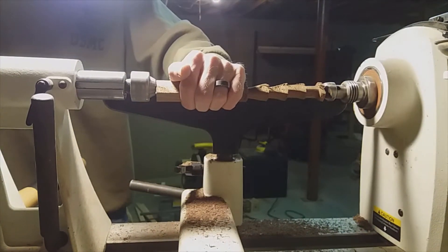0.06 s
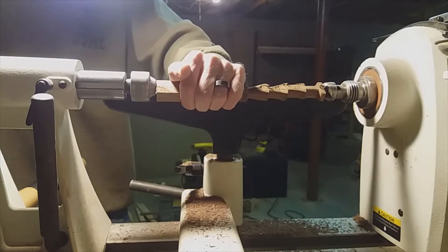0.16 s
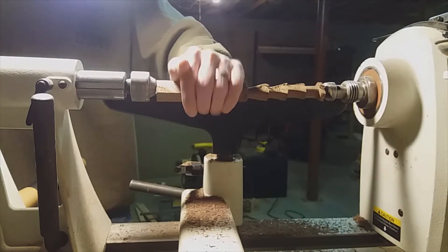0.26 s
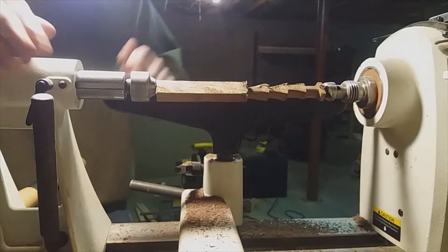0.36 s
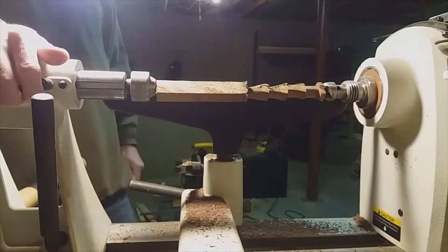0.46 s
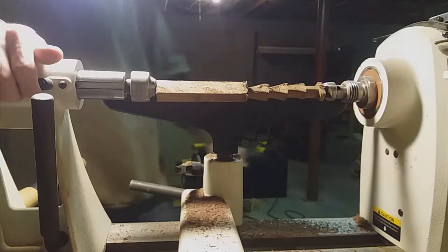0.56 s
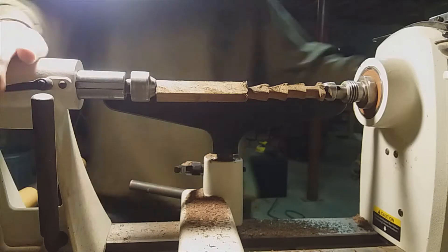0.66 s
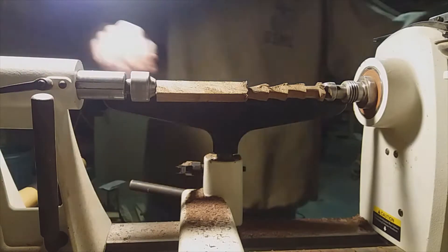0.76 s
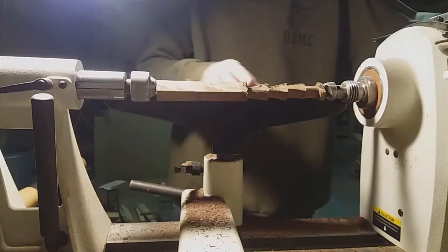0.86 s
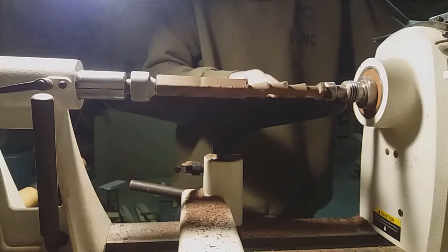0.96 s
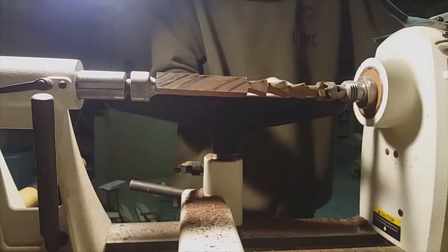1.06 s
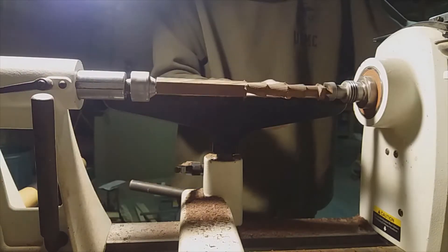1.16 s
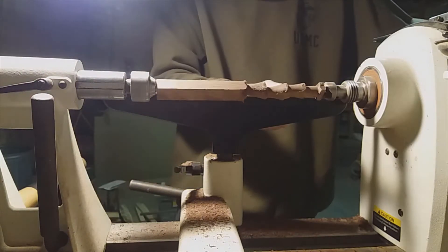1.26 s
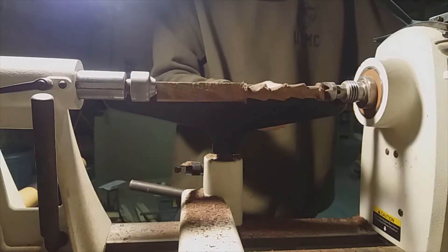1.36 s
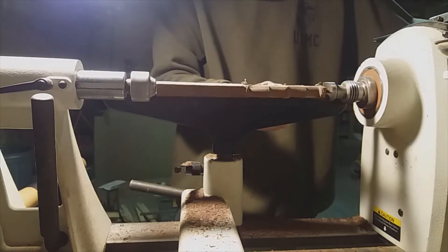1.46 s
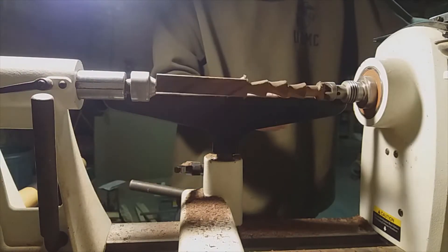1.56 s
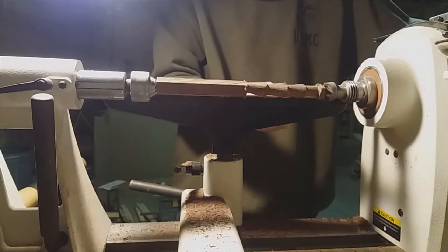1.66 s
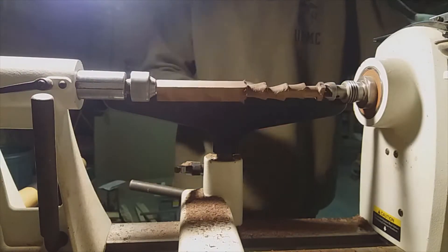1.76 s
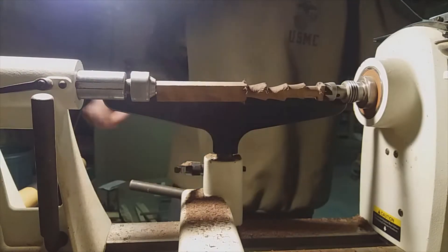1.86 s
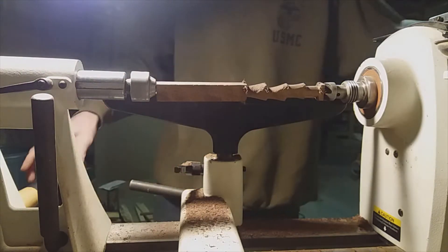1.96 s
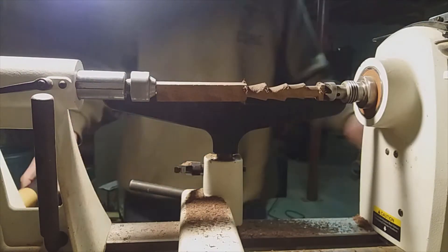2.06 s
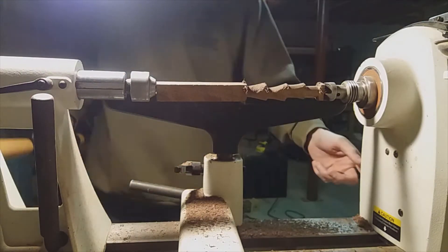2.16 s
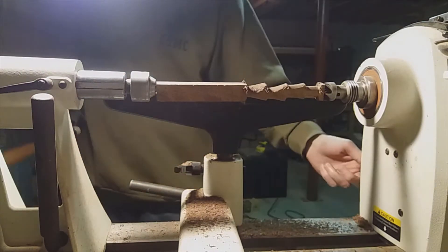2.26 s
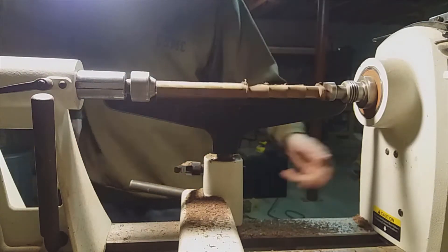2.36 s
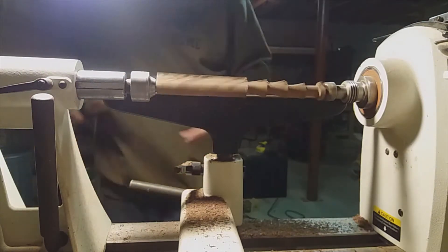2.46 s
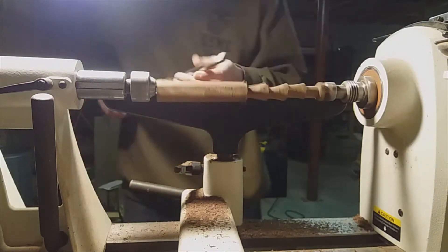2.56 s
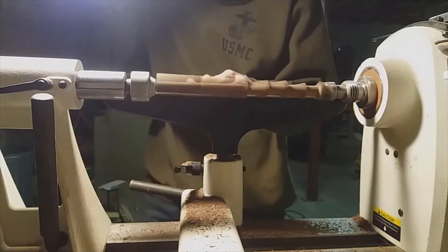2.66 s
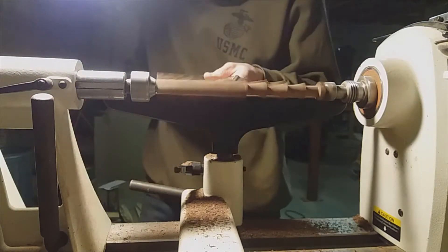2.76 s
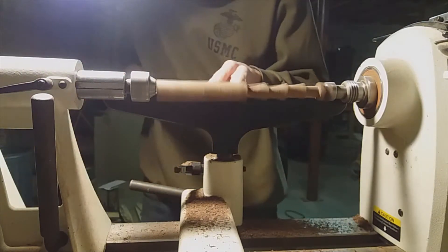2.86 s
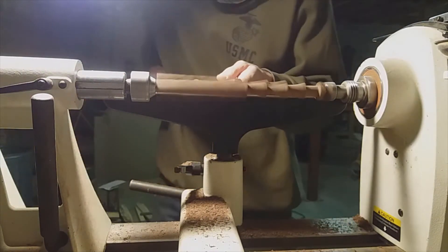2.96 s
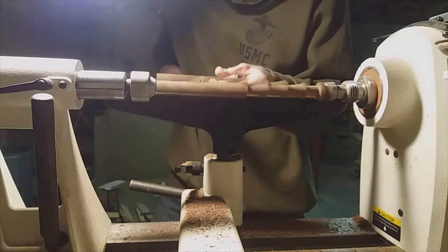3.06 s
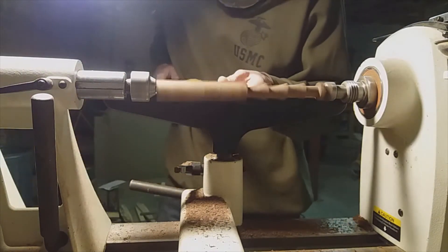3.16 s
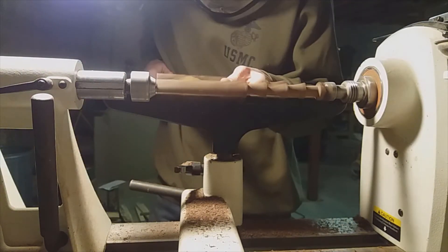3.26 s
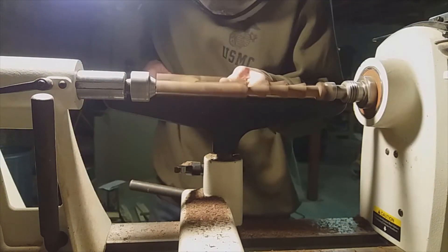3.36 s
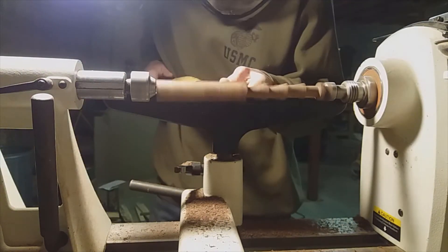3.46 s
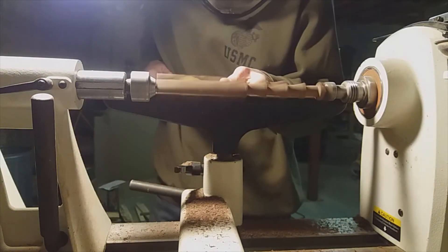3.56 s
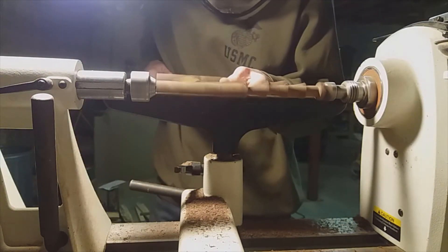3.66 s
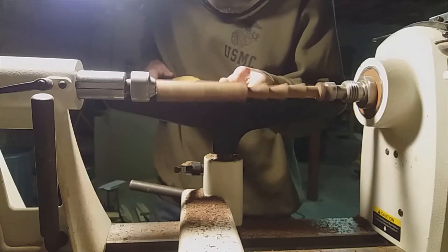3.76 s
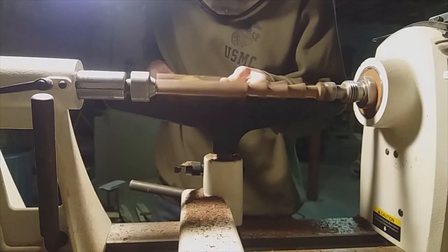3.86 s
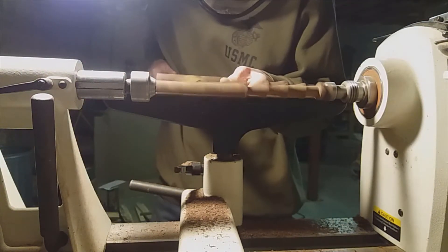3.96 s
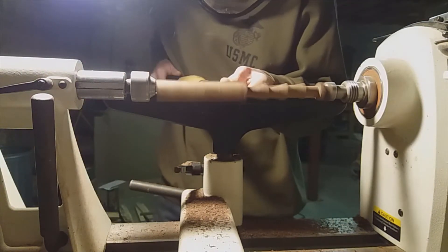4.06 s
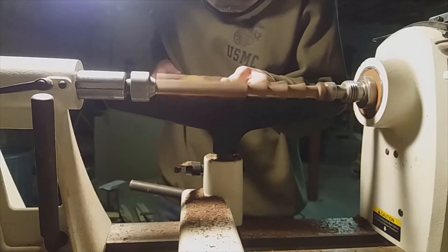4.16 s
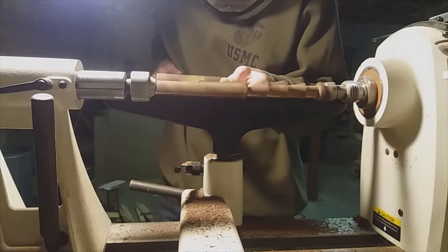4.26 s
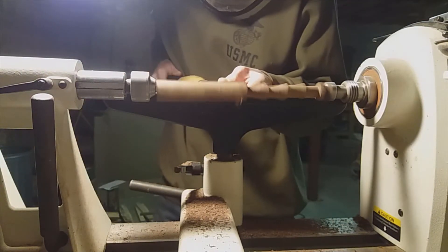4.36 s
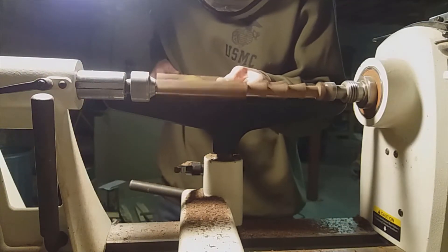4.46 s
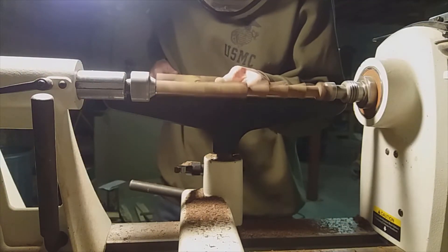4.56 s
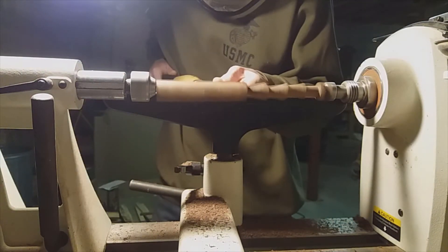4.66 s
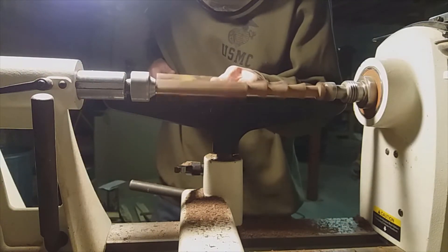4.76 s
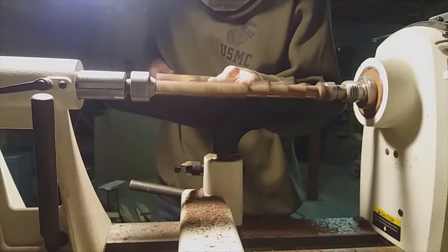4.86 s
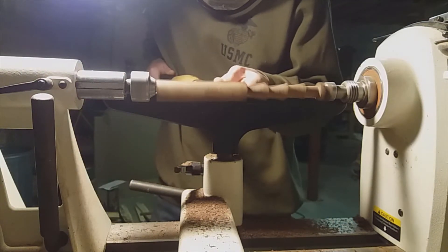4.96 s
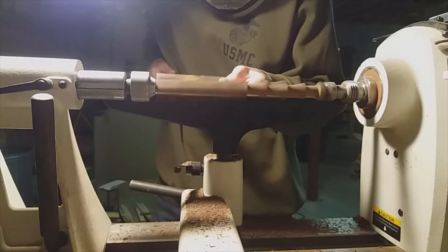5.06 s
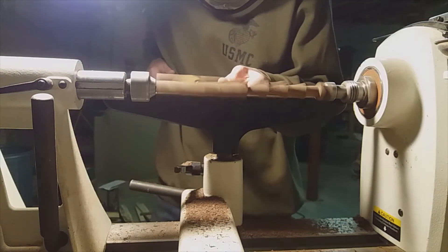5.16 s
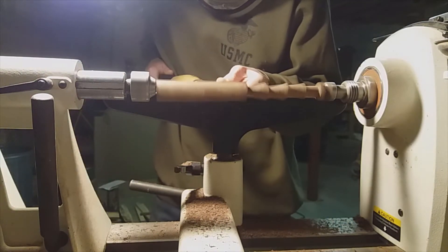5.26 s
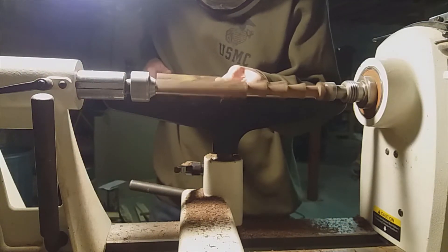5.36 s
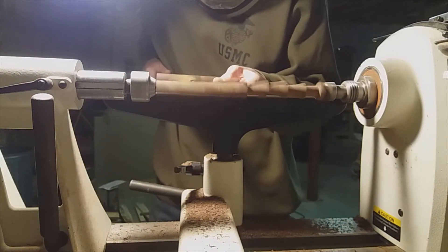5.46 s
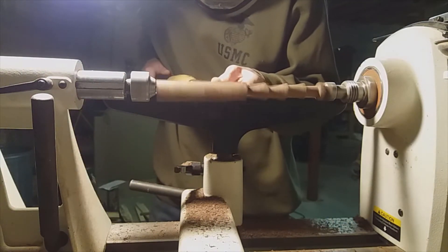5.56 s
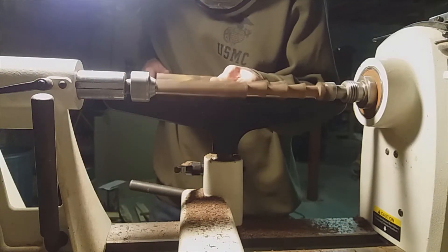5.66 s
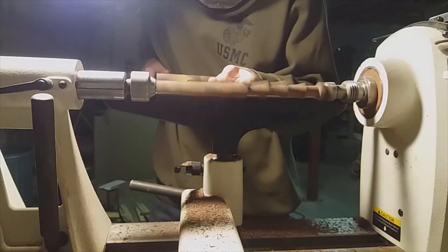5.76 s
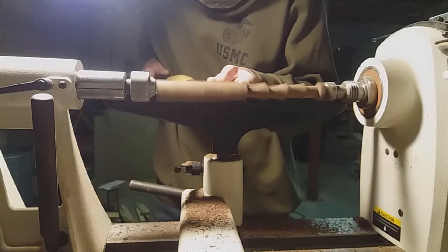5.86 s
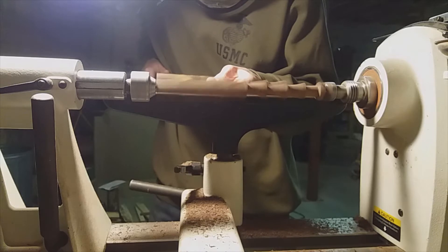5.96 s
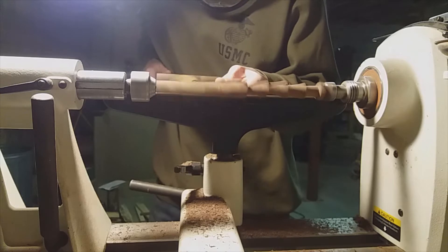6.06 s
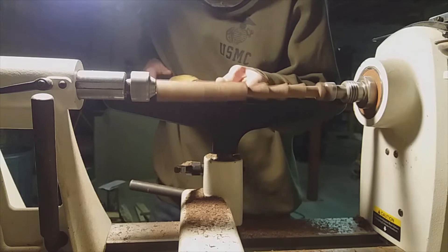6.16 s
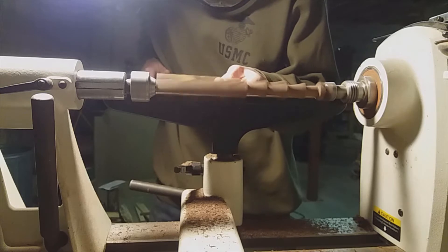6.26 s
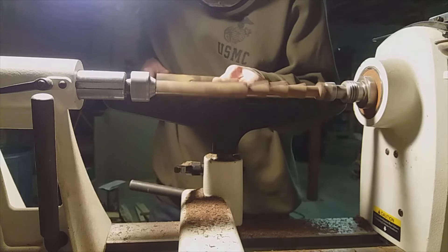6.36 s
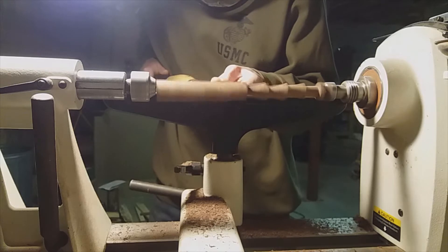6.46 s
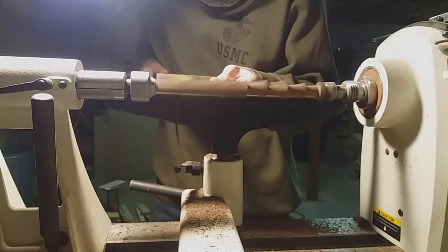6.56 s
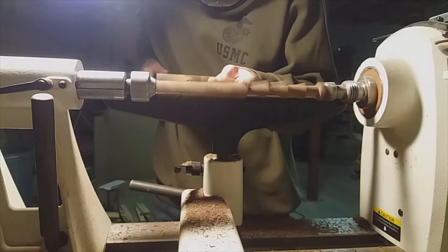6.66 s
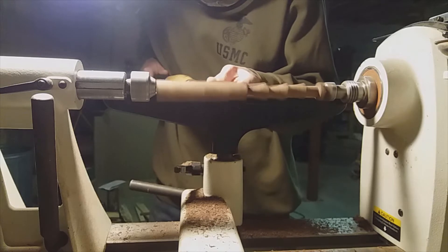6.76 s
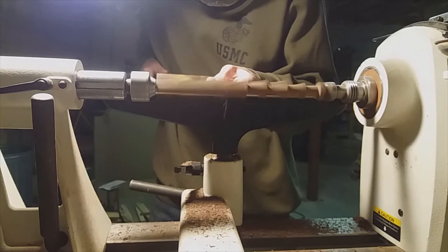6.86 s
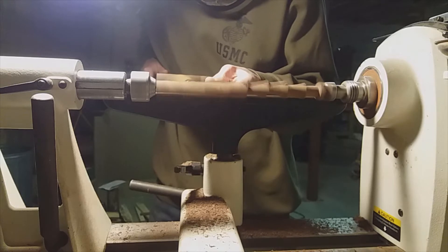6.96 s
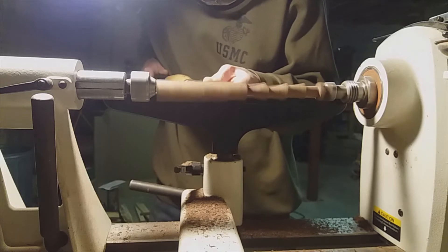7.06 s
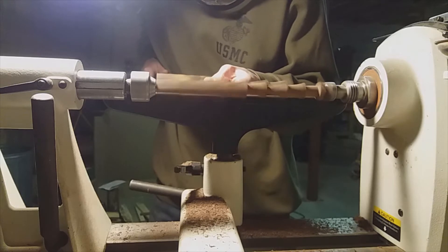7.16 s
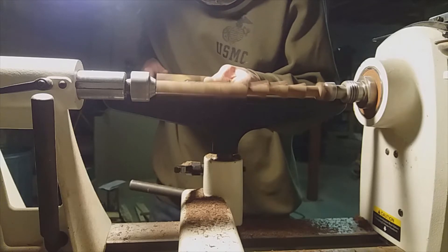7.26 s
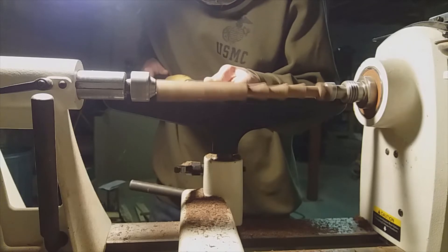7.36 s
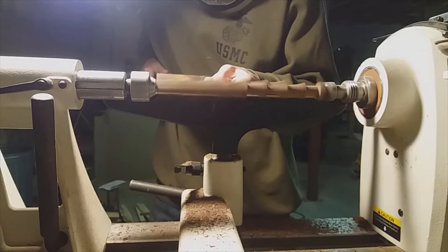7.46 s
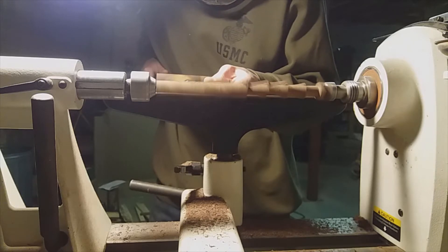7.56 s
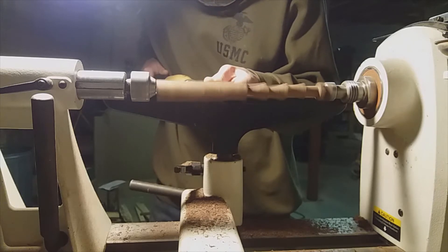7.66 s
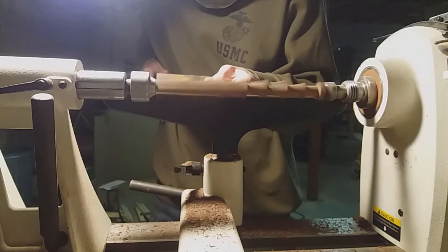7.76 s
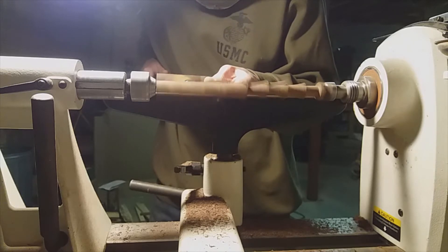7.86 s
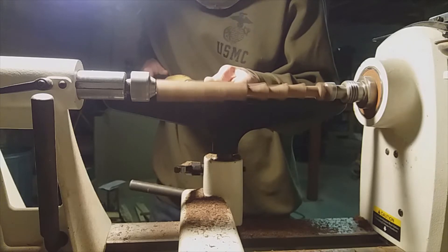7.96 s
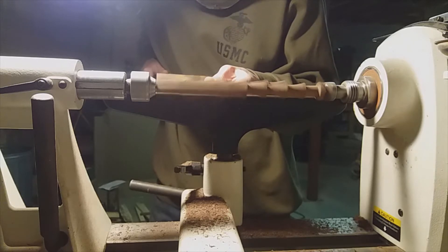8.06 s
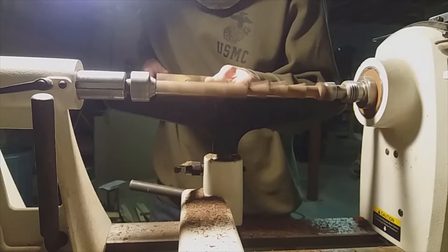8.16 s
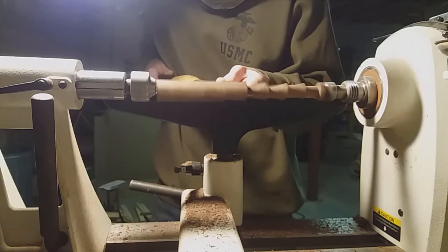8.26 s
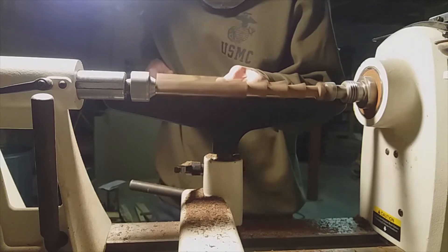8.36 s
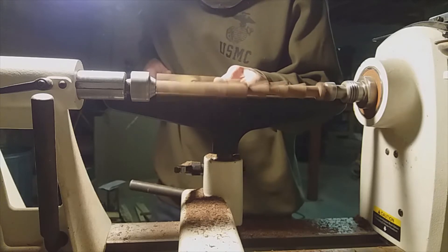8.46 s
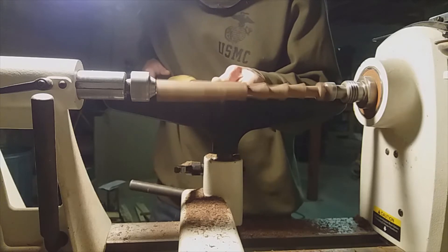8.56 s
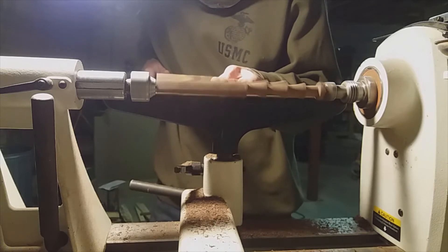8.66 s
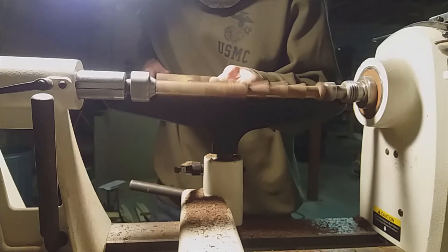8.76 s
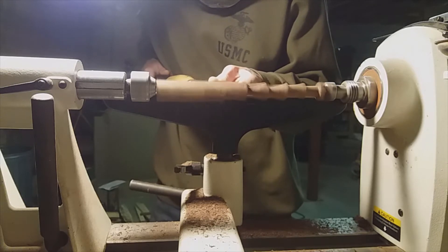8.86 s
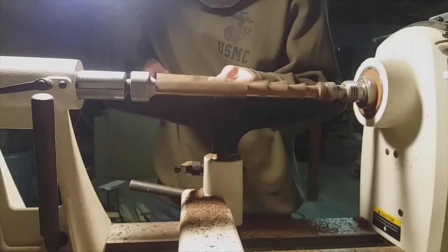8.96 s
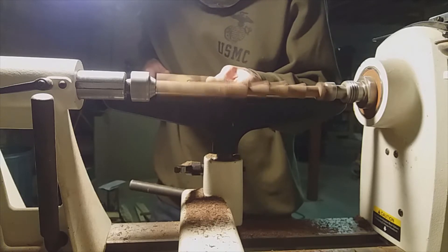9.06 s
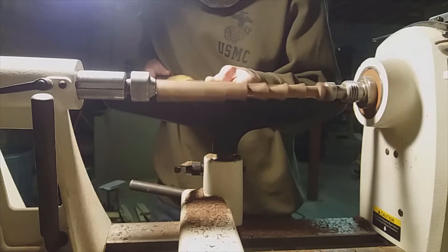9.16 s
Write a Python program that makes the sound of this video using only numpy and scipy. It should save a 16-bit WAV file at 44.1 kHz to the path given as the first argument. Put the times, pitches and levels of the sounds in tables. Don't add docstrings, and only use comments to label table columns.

```python
import sys
import numpy as np
from scipy import signal
from scipy.fft import rfft, irfft, next_fast_len
from scipy.io import wavfile
from scipy.ndimage import uniform_filter1d, map_coordinates

SR = 44100
rng = np.random.default_rng(int(sys.argv[2]) if len(sys.argv) > 2 else 0)


def linear_from_db(decibels):
    return 10 ** (np.asarray(decibels, float) / 20)


def log_audio(samples):
    frames = np.atleast_2d(samples).T
    limited = np.clip(frames, -1, 1)
    pcm = np.round(limited * 32767).astype(np.int16)
    wavfile.write(sys.argv[1], SR, pcm)


N = 405276
T = np.arange(N) / SR

CORNER_HZ, CORNER_LAG = 56.7, 0.69
# frequency in Hz, level in dB.
SQUEAL_TONES = [(2302, 2), (2140, -25), (2715, -14), (2954, -9), (3190, -19)]
# frequency in Hz, level in dB.
LOW_SQUEAL_TONES = [(2064, 1), (1887, -2.5), (1730, -6.5)]
# frequency in Hz, width in Hz, level in dB.
BLANK_MODES = [(450, 50, -15), (610, 60, -20), (850, 50, -12), (965, 25, -9), (1135, 30, -1), (1245, 30, 0)]
# frequency in Hz, width in Hz, level in dB.
CENTRE_MODES = [(1225, 360, 0.5), (580, 410, -1)]
# frequency in Hz, density in dB per Hz.
GRIT_COLOUR = [(530, -51), (900, -45), (1230, 4), (1380, -11.5), (1560, 0), (1860, -2), (2310, -1),
               (2510, -2.5), (3000, -7), (3860, -11), (6610, -14), (15600, -23)]
# frequency in Hz, width in Hz, level in dB.
PAPER_MODES = [(4800, 500, -4), (6550, 800, 0), (8600, 500, -1), (10000, 700, -3), (13600, 900, -1)]
# time in seconds, grit level in dB.
STROKE_PRESSURE = [
    [(4.03, -41), (4.27, -40), (4.5, -34), (4.8, -32), (4.92, -44.5)],
    [(5.09, -32), (5.5, -29.5), (5.8, -29), (5.93, -31), (5.99, -36)],
    [(6.18, -30), (6.45, -30.5), (6.84, -30), (6.89, -26), (6.945, -34)],
    [(7.15, -34), (7.36, -30.5), (7.75, -30), (8.0, -28), (8.08, -24), (8.18, -33.5)],
    [(8.335, -31.5), (8.52, -28.5), (8.65, -30.5), (8.9, -29.5), (9.19, -33)],
]
# squeal, lower squeal and knock in dB beside the grit, change of the knock over the
# stroke in dB.
STROKE_VOICE = [(4.5, 6, 0.5, 4), (0.5, 2, 2, 1), (0, 1, 1.5, -2.5), (0, 4, 0, -6.5), (5.5, 2, -2, -1)]
# start in seconds, length in seconds, rise in dB.
SQUEAL_FLARES = [(4.84, 0.037, 8), (5.142, .04, 11.5), (5.2, .03, 5), (5.343, 0.028, 8.5), (5.5, .17, 3.5),
                 (5.718, 0.14, 6), (5.877, 0.043, 9), (5.934, 0.05, 11), (6.191, 0.042, 10),
                 (6.356, 0.078, 12), (6.502, 0.12, 8), (6.652, 0.075, 8), (6.746, 0.066, 9.5),
                 (7.155, 0.018, 16), (7.377, .03, 6), (7.44, 0.12, 10), (7.57, 0.081, 9.5),
                 (7.67, 0.12, 9.5), (7.802, 0.07, 12.5), (7.913, 0.093, 10.5), (8.017, 0.037, 7),
                 (8.107, 0.063, 13.5), (8.381, 0.058, 4), (8.518, 0.14, 3.5), (8.73, 0.083, 7.5),
                 (8.83, 0.051, 1.5), (8.953, 0.16, 1), (9.137, 0.051, 9)]
# time in seconds, change in dB.
FINGER_NUDGES = [(4.046, 8), (4.07, 6), (4.32, 5), (4.36, -4), (4.4, 3), (4.485, -3), (4.52, 1),
                 (4.565, -3), (4.61, 3), (4.67, -10.5), (4.745, -5.5), (4.79, 2), (4.85, -0.5), (4.885, 7),
                 (5.25, -1.5), (7.175, 1), (7.215, -5.5), (7.34, -1.5), (7.52, -2), (7.77, -2), (7.85, 1)]
FIRM_DB = -34.5
LOW_GROWS, KNOCK_GROWS = 1.1, 1.48
STEALS_LOW, STEALS_KNOCK = 0.18, 0.23

# time in seconds, motor turns a second.
MOTOR_SPEED = [(2.33, 15), (2.45, 33), (2.6, 49), (2.7, 59), (2.78, 68), (2.85, 79.5), (2.895, 83.62),
               (9.19, 83.62)]
MOTOR_ORDERS = [5, 6, 12, 16, 18, 24, 30, 35, 36, 37, 42, 48, 78]
# level on the housing's resonance in dB, change under load in dB.
ORDER_LEVELS = [(-56, 0), (-38.5, -1), (-45, 0.5), (-49.5, 1.5), (-52, 0), (-47, 1.5), (-69, 29),
                (-41, -12), (-43, 5.5), (-37.5, 6.5), (-46.5, -3), (-57.5, 9), (-46.5, 0.5)]
# frequency in Hz, width in Hz, level in dB.
HOUSING_MODES = [(3010, 320, 0), (502, 60, 0), (1004, 60, 0), (1338, 50, -2), (1505, 50, -2),
                 (2008, 50, -3), (3512, 25, -4), (6500, 600, 0), (4014, 40, -2), (2450, 500, -11)]
# frequency in Hz, width in Hz, level in dB.
FRAME_MODES = [(456, 142, -10.5), (820.3, 14, 3), (1263, 71, -10), (2106, 53, -7.5), (3010, 165, -6),
               (6400, 136, -17.5), (8120, 100, -19.5), (8560, 120, -22), (9880, 540, -23), (13800, 56, -20)]
# frequency in Hz, density in dB per Hz.
BEARING_COLOUR = [(120, -45), (200, -3.5), (439, -2.5), (499, -1), (599, -36), (999, -5.5), (1700, -8),
                  (2990, -16), (3730, -12), (6570, -11.5), (15800, -30)]
# time in seconds, level in dB.
BEARING_LEVEL = [(2.33, -37), (2.85, -35), (4, -36), (5, -36), (6.08, -37.5), (7.05, -36), (8.25, -38),
                 (9.19, -35.5)]
# frequency in Hz, width in Hz, level in dB.
FREE_CENTRE_HISS = [(6590, 580, 0)]
LOADED_CENTRE_HISS = [(6170, 300, 0)]
# time in seconds, half length in seconds, level in dB.
BELT_SQUEAKS = [
    (2.395, .014, -64),
    (2.452, 0.0067, -63),
]

# time in seconds, peak in dB, thud in dB, decay by 60 dB in seconds.
CONTACT_TICKS = [
    (2, -44, -8, 0.038),
    (2.3172, -24, -3.5, 0.032),
    (2.7847, -31, -19, 0.025),
    (3.1752, -22.5, -28, 0.026),
    (3.1796, -22, -27, 0.022),
]
# frequency in Hz, level in dB, decay by 60 dB in seconds.
SWITCH_RING = [(517, 0, 0.023), (1970, -26, 0.09), (3650, -24, 0.083), (5470, -39, 0.093),
               (6470, -21, 0.064), (8000, -36, 0.039), (11130, -41, 0.077)]
# frequency in Hz, width in Hz, level in dB.
CRACK_MODES = [(5100, 3100, 3.5), (13300, 4300, -17)]

# frequency in Hz, level in dB.
BLOWER_TONES = [(177.6, -50), (276, -57), (359, -60), (308, -70), (241, -69), (10497, -76)]
# frequency in Hz, width in Hz, level in dB.
DUCT_MODES = [(505, 93, 4), (549, 17, 12.5), (834, 39, 0), (1054, 20, -13)]
# frequency in Hz, density in dB per Hz.
AIR_COLOUR = [(100, -30), (160, -21), (310, -14), (400, -9), (500, -4), (630, -11), (800, -8), (1150, -10),
              (1500, -21), (2700, -21), (4000, -25), (8000, -34), (11000, -38), (15800, -44)]

# frequency in Hz, decay by 60 dB in seconds.
WALL_DECAY = [(200, 0.063), (2000, 0.31), (10000, 0.009)]
# frequency in Hz, left-right likeness from 0 to 1.
PORT_LIKENESS = [(60, .2), (150, 0.54), (500, 0.94), (1200, 0.5), (2400, 0.38), (5000, 0.38), (9000, 0.21),
                 (15000, 0.067)]
# frequency in Hz, left minus right in dB.
PORT_TILT = [(60, 0), (110, 21), (200, 1.5), (380, 3.5), (700, 1.5), (1290, 0.5), (2380, 3.5), (4400, -0.5),
             (8120, 0), (15000, -5.5)]
# frequency in Hz, lead of the left in radians.
PORT_LEAD = [(100, 0), (950, -.3), (1460, 0), (2300, -.9), (3100, -.9), (4220, -3.1), (6500, -4.5),
             (8300, -8.1), (10000, -9.2), (13000, -9.5), (16000, -12)]
# frequency in Hz, gain after the step in dB.
BASS_STEP = [(90, -1), (180, -9), (500, -6.5), (680, -8), (1000, -2.5), (3000, 1), (8000, 0)]


def unit(x):
    return x / np.sqrt(np.mean(x ** 2) + 1e-20)


def along(points, hz):
    f, v = np.transpose(points)
    return np.interp(np.log(hz + 1), np.log(f + 1), v)


def wobble(rate):
    return map_coordinates(rng.standard_normal(int(N * rate / SR) + 4), [T * rate])


def filtered(x, response):
    m = next_fast_len(N + SR // 2)
    return irfft(rfft(x, m) * response(np.fft.rfftfreq(m, 1 / SR)), m)[..., :N]


def modes(table, f):
    total = 0
    for k, (centre, width, db) in enumerate(table):
        damping = 1j * f * width
        total = total + (-1) ** k * linear_from_db(db) * damping / (centre * centre - f * f + damping)
    return total


def noise(spectrum, peaks=None, peak_db=0):
    white = rng.standard_normal((2, N))
    smooth = unit(filtered(white, lambda f: linear_from_db(along(spectrum, f))))
    if peaks is None:
        return smooth
    ringing = unit(filtered(white[::-1], lambda f: modes(peaks, f)))
    return unit(smooth + linear_from_db(peak_db) * ringing)


def sanding():
    place = T * CORNER_HZ - CORNER_LAG
    corner = np.floor(place).astype(int) + 1
    count = corner[-1] + 1
    luck = np.clip(rng.standard_normal((count, 24)), -2, 2)[corner].T
    since = (place % 1) / CORNER_HZ
    touch_times = (np.arange(count) - 0.8 + CORNER_LAG) / CORNER_HZ
    squeal, low, knock, grit = hand(touch_times)[:, corner]
    drag = 0.0095 * linear_from_db(0.16 * luck[1])
    touch = 1 - np.exp(-(since / 0.0011) ** 2)
    hold = touch * linear_from_db(-250 * since - 2200 * np.clip(since - drag, 0, 1))

    def sing(table, first):
        total = 0
        for k, (hz, db) in enumerate(table):
            strength = linear_from_db(db + 1.8 * luck[first + 2 * k])
            pitch = hz * (1 + 0.006 * luck[first + 2 * k + 1])
            total = total + strength * np.sin(2 * np.pi * pitch * since + 0.72 * wobble(70))
        return total

    tones = squeal * sing(SQUEAL_TONES, first=2) + low * sing(LOW_SQUEAL_TONES, first=12)
    tones = linear_from_db(5) * hold * tones
    slap = linear_from_db(2 * luck[20]) * since / 0.0001 * np.exp(-since / 0.0001)
    push = slap + 0.18 * hold * rng.standard_normal(N)
    blank = filtered(linear_from_db(43) * knock * push, lambda f: modes(BLANK_MODES, f) * modes(CENTRE_MODES, f))

    bite = np.clip(since - 0.00045 * np.abs(luck[0]), 0, 1) / (0.0024 * linear_from_db(1.4 * luck[22]))
    rub = 0.19 * (grit / linear_from_db(FIRM_DB)) ** 0.65 * linear_from_db(4.3 * np.tanh(wobble(60)))
    burst = bite * np.exp(1 - bite) + rub
    grains = linear_from_db(2.1 * wobble(700) + 0.35 * luck[21])
    treble = [(1500, -9.5), (3000, -1.5), (4200, -2.0)]  # (Hz, dB)
    bright = unit(filtered(noise(GRIT_COLOUR, PAPER_MODES, peak_db=-7.0), lambda f: linear_from_db(along(treble, f))))
    return (tones + blank) * [[1], [0.3]] + linear_from_db(9.0) * grit * burst * grains * bright


def hand(at):
    nudge = sum(db * np.exp(-((at - s) / 0.021) ** 2) for s, db in FINGER_NUDGES)
    flare = 0
    for s, length, db in SQUEAL_FLARES:
        inside = np.minimum(at - s, s + length - at)
        flare = flare + db * np.clip(inside / 0.02 + 0.5, 0, 1)
    gains = np.zeros((4, len(at)))
    for rows, (squeal_db, low_db, knock_db, fade_db) in zip(STROKE_PRESSURE, STROKE_VOICE):
        s, db = np.transpose(rows)
        press = np.interp(at, s, db) + nudge - FIRM_DB
        progress = (at - s[0]) / (s[-1] - s[0])
        squeal = press + squeal_db + flare
        low = LOW_GROWS * press + low_db - STEALS_LOW * flare
        knock = KNOCK_GROWS * np.minimum(press, 0) + knock_db + fade_db * progress - STEALS_KNOCK * flare
        during = (at > s[0]) & (at < s[-1])
        gains += during * linear_from_db(FIRM_DB + np.array([squeal, low, knock, press]))
    return gains


def motor():
    speed = np.interp(T, *np.transpose(MOTOR_SPEED))
    relative = speed / speed[-1]
    turns = np.cumsum(speed) / SR + 0.0005 * wobble(7)
    level_db = np.interp(T, *np.transpose(BEARING_LEVEL))
    pulling_up = np.exp(-np.clip(T - MOTOR_SPEED[-3][0], 0, None) / 0.05)
    whine_db = 2 + 2.27 * (level_db - level_db[4 * SR]) + 7.5 * pulling_up
    load = np.clip((T - 4.0) / 0.15, 0, 1)
    worn = np.clip((T - 4.4) / 0.6, 0, 1)
    starting = np.clip((2.77 - T) / 0.02, 0, 1)

    whine = 0
    for k, (db, load_db) in zip(MOTOR_ORDERS, ORDER_LEVELS):
        winding_db = (k == 48) * 26 * starting
        strength = linear_from_db(db + 1.0 + load * load_db + winding_db + 0.65 * wobble(10))
        resonance = np.abs(modes(HOUSING_MODES, k * speed)) ** 2
        whine = whine + strength * resonance * np.sin(2 * np.pi * k * turns)
    whine = linear_from_db(whine_db) * relative ** 5.3 * whine

    throb = linear_from_db(0.79 * np.sin(2 * np.pi * turns) + 1.0 * wobble(40))
    white = rng.standard_normal((2, N))
    free = unit(filtered(white, lambda f: modes(FREE_CENTRE_HISS, f) ** 2))
    loaded = unit(filtered(white, lambda f: modes(LOADED_CENTRE_HISS, f) ** 2))
    centre = linear_from_db(-9.5) * (1 - worn) * free + linear_from_db(-8.5) * worn * loaded
    bearing = noise(BEARING_COLOUR, FRAME_MODES, peak_db=5.5)
    hiss = linear_from_db(level_db) * relative ** 1.66 * throb * (bearing + centre)
    return (T > MOTOR_SPEED[0][0]) * (hiss + whine * [[1], [0.3]])


def belt():
    swell = sum(linear_from_db(db) * np.exp(-((T - s) / half) ** 2) for s, half, db in BELT_SQUEAKS)
    return swell * np.sin(2 * np.pi * 12000 * T + 1.2 * wobble(200)) * [[1], [0.5]]


def ticks():
    cracks, body = np.zeros((2, N + SR)), np.zeros(N + SR)
    t = np.arange(SR // 8) / SR
    casing = np.sin(2 * np.pi * 520 * t) + 0.78 * np.sin(2 * np.pi * 680 * t)
    casing = casing * (1 - np.exp(-(t / 0.0038) ** 2))
    ring = 0
    for hz, level, life in SWITCH_RING[1:]:
        ring = ring + linear_from_db(level - 60 * t / life) * np.sin(2 * np.pi * hz * t)
    for s, db, thud_db, t60 in CONTACT_TICKS:
        start = round(s * SR)
        thud = linear_from_db(thud_db + 17.5 - 60 * t / 0.027) * casing
        crack = linear_from_db(db + 3.5 - 60 * t / t60) * rng.standard_normal((2, len(t)))
        cracks[:, start:start + len(t)] += crack
        body[start:start + len(t)] += linear_from_db(db) * (3 * ring + thud)
    return filtered(cracks[:, :N], lambda f: modes(CRACK_MODES, f)) + body[:N] * [[1], [0]]


def blower():
    tones = 0
    for hz, db in BLOWER_TONES:
        strength = linear_from_db(db + 3.0 + 0.7 * wobble(6))
        tones = tones + strength * np.sin(2 * np.pi * hz * T + 0.55 * wobble(3.25))
    air = linear_from_db(-43.5 + 0.72 * wobble(17)) * noise(AIR_COLOUR, DUCT_MODES, peak_db=-5)
    return air + tones * [[1], [0]]


def walls(x):
    hz, t, z = signal.stft(rng.standard_normal((2, SR // 2)), SR, nperseg=256)
    decay = linear_from_db(-60 * t / along(WALL_DECAY, hz)[:, None])
    tail = signal.istft(z * decay, SR, nperseg=256)[1]
    delayed = np.pad(x, (300, 0))[None]
    return signal.fftconvolve(delayed, tail / np.linalg.norm(tail[0]), axes=1)[:, :N]


def ports(pair):
    def share(hz):
        angle = np.arccos(np.clip(along(PORT_LIKENESS, hz), 0, 1)) / 2
        return np.array([np.cos(angle), np.sin(angle)])

    def tilts(hz):
        tilt = linear_from_db(along(PORT_TILT, hz) / 2) * np.exp(0.5j * along(PORT_LEAD, hz))
        return np.array([tilt, 1 / tilt])

    mid, side = filtered(pair, share)
    return filtered(np.array([mid + side, mid - side]), tilts)


def scene():
    rasp, clicks = sanding(), ticks()
    steady = filtered(rasp + motor() + belt() + blower(), lambda hz: hz < 15850)
    return ports(steady + clicks) + linear_from_db(-20) * walls(steady[0] + clicks[0])


def band_limit(x):
    return signal.sosfilt(signal.butter(12, 17200, fs=SR, output="sos"), x)


def record(dry):
    x = filtered(dry, lambda hz: (1j * hz / (95 + 1j * hz)) ** 3)
    step = np.clip((T - 4.71) / 0.012, 0, 1)
    x = x + step * (filtered(x, lambda hz: linear_from_db(along(BASS_STEP, hz))) - x)
    loudness = uniform_filter1d(np.abs(x[0]), size=1500)
    rumble = noise([(15, -15.0), (45, -5), (100, -11.5), (160, -3), (400, -120)])
    idle = linear_from_db(-79 + 2.5 * wobble(7))
    x = x + (idle + linear_from_db(-50 + 4 * wobble(9)) * loudness) * rumble - 0.0006
    mix = x / (1 + np.abs(x / 0.95) ** 6) ** (1 / 6)
    return band_limit(mix)


dry = scene()
out = record(dry)
log_audio(out)
```